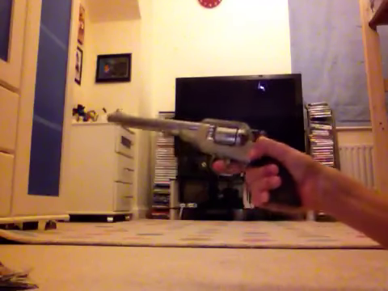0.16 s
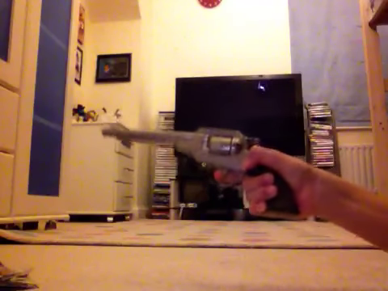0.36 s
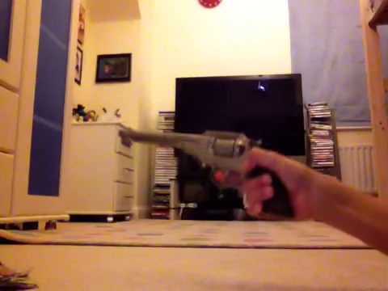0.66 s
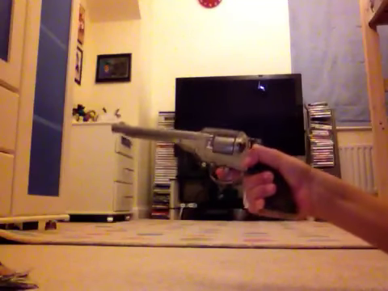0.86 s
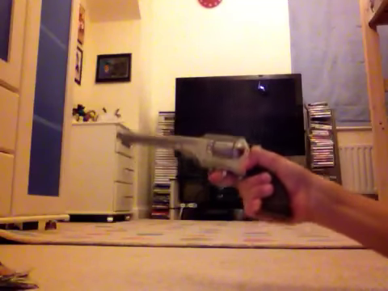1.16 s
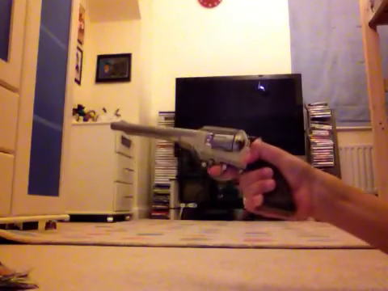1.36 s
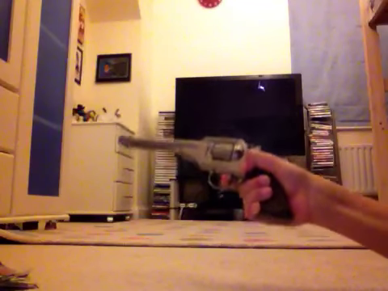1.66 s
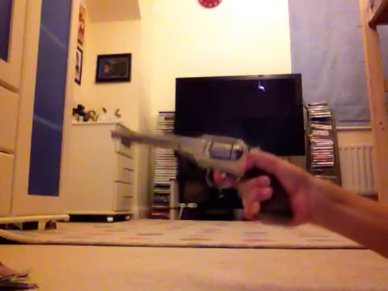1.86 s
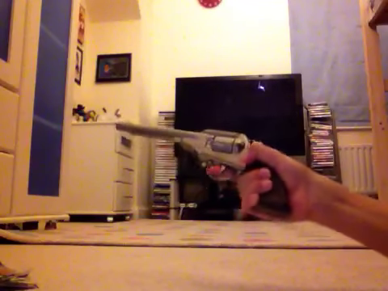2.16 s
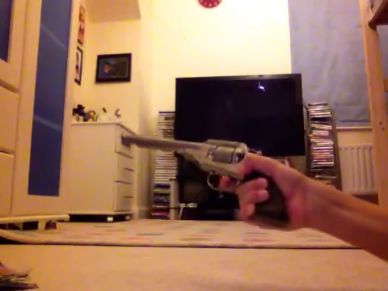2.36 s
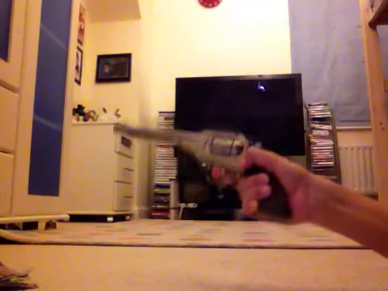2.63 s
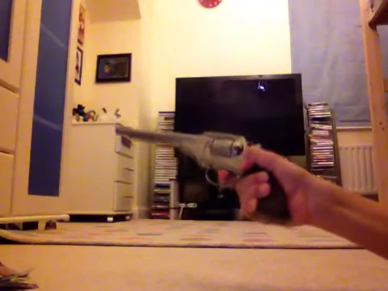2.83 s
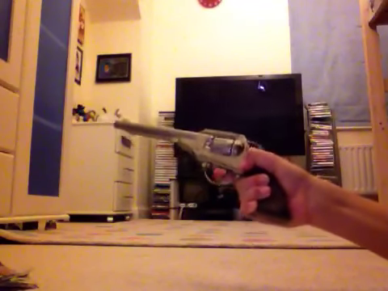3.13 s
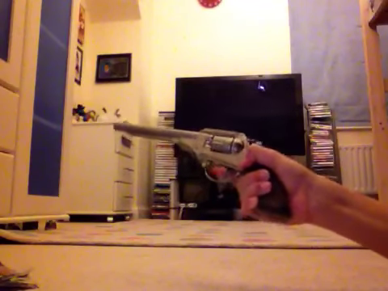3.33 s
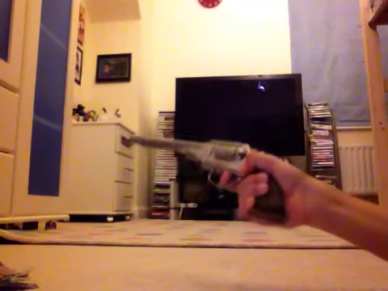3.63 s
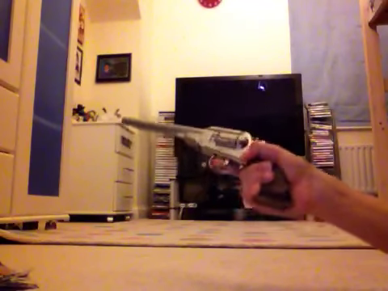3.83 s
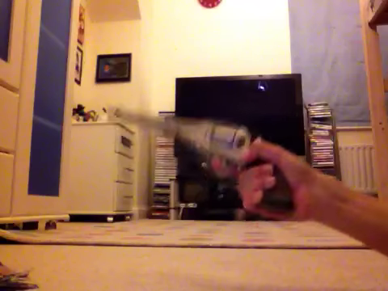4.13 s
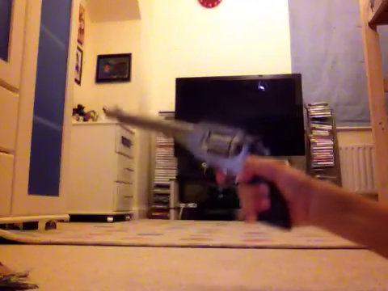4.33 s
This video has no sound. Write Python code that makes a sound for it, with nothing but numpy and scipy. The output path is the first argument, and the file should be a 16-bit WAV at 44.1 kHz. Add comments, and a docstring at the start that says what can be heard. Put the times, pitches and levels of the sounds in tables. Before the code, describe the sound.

A toy metal revolver is fired repeatedly in a small room, sharp clicks and snaps broken by two loud, distorted cap bangs.

```python
"""In a small living room, a die-cast toy revolver is fired over and over, close by.
Each pull ticks the cylinder round and drops the hammer; the trigger then snaps back.
Two caps go off and overload the microphone, one only fizzles, the other blows fall dry.
Metal contacts and cap bursts are dense random impacts, filtered so that resonances ring.
Fading noise makes the room's answer; steady noise and a motor's hum lie behind it all."""
import sys
import numpy as np
from scipy import signal
from scipy.io import wavfile
from scipy.ndimage import uniform_filter1d

SR = 44100
rng = np.random.default_rng(int(sys.argv[2]) if len(sys.argv) > 2 else 0)


def unload_audio(sound):
    """Save the sound as a 16-bit wav file, at the path given as the first command line argument."""
    columns = np.transpose(np.atleast_2d(sound))
    # keep every value between -1 and 1, then stretch to whole-number steps
    steps = np.round(np.clip(columns, -1, 1) * 32767)
    wavfile.write(sys.argv[1], SR, steps.astype(np.int16))


N = 198097  # length of the scene [samples]

TAPS = 4096  # length of one contact sound [samples]
HZ = np.fft.rfftfreq(TAPS, 1 / SR) + 1  # 1 Hz up, which keeps the logarithm finite
T = np.arange(TAPS) / SR  # time within a contact sound [s]

# trigger snapping back: (time [s], level [dB], brightness [dB per octave],
#   low ring [Hz], high ring [Hz])
RETURNS = [(-.027, -27, -2.3, 1400, 5000), (0.6911, -28, 1, 1650, 8100), (1.159, -31.5, 1.6, 1560, 12400),
           (1.7435, -28, 0.7, 2780, 5840), (2.1374, -26.5, 1, 1820, 6440), (2.5285, -31, 1.9, 2040, 7000),
           (2.906, -33, 0.6, 3130, 6000), (3.3777, -27, 1, 1150, 5500), (3.77, -25, 0.1, 2580, 5500),
           (4.1682, -26.5, 0, 1903, 7230)]
# resonances of the metal frame: (frequency [Hz], width [Hz], lift [dB])
FRAME = [(655, 36, 9), (1193, 180, 8.5), (1736, 220, 7), (2700, 190, 6), (3700, 380, 4), (5200, 420, 1.5),
         (9470, 840, 4.5), (10910, 170, 8.5), (12330, 550, 8.5)]
# how the gun's own noise carries into the room; small parts radiate little bass:
#   (frequency [Hz], relative level [dB])
CARRY = [(100, -6.5), (600, -6), (1100, -5), (1500, -2.5), (2000, 5), (2600, 4), (3400, -0.5), (5000, -2),
         (9000, 1), (15000, -1.5)]
# first reflections from ceiling and walls: (delay [s], gain before the room's colouring)
ECHOES = [(.0133, .2), (0.017, .2), (0.022, .16)]


def gain_of(db):
    """Decibels to amplitude."""
    return 10 ** (np.asarray(db) / 20)


def read(points, hz):
    """A curve joined by straight lines on a log-frequency axis."""
    f, value = np.transpose(points)
    return np.interp(np.log(hz + 1), np.log(f + 1), value)


def levelled(x, db):
    """Scales a short sound so that its energy, spread over 10 ms, has this level."""
    return x * gain_of(db) * np.sqrt(.01 * SR / np.sum(x ** 2))


def add(mix, s, sound):
    """Mixes a sound in at time s, cutting off whatever falls outside the scene."""
    at = int(round(s * SR))
    sound = sound[max(-at, 0):]
    part = mix[max(at, 0):][:len(sound)]
    part += sound[:len(part)]


def colour(x, db):
    """Filter with the gain db over HZ that never sounds early: its peaks ring after the blow."""
    log_gain = np.log(gain_of(np.r_[db, db[-2:0:-1]]))
    # the Hilbert transform finds the phase that puts the energy as early as possible
    minimum_phase = np.exp(np.conj(signal.hilbert(log_gain)))
    response = np.fft.ifft(minimum_phase).real
    return signal.fftconvolve(x, response[:TAPS // 2])[:len(x)]


def fade(start, decay):
    """A sudden rise at start and an exponential fall."""
    return (T >= start) * np.exp(-np.maximum(T - start, 0) / decay)


def chatter(envelope):
    """Dense tiny impacts of random sign under an envelope."""
    return envelope * rng.choice([-1., 1.], TAPS)


def click(contact, spectrum_db, db):
    """The direct sound of one contact: tiny impacts coloured by what they strike."""
    return levelled(colour(chatter(contact), spectrum_db), db)


def lifts(modes):
    """Resonance peaks in dB over HZ."""
    return sum(db / (1 + (2 * (HZ - hz) / width) ** 2) for hz, width, db in modes)


def ripple(size):
    """Chance unevenness over pitch, of about unit spread: no two blows ring alike."""
    return np.sqrt(size) * uniform_filter1d(rng.standard_normal(len(HZ)), size=size)


def tilt(bright_db):
    """Harder contacts are brighter: a slope in dB per octave above 1 kHz."""
    return bright_db * np.log2(np.maximum(HZ, 1000) / 1000)


def room(spectrum_db, early, length=1.0, gap=.0135, build=0.00096, linger=1.92, uneven_db=1.0):
    """Diffuse tail, thin until the ceiling and walls answer, with a weak slower decay behind it."""
    # time to fall by 60 dB, before the factor length: (frequency [Hz], time [s])
    fall_times = [(60, 0.091), (170, 0.24), (500, 0.28), (1000, 0.3), (2000, 0.22), (4000, 0.25),
                  (7000, .25), (11000, 0.23), (15000, 0.19)]
    # slow second decay, which furnishings strip of treble: (frequency [Hz], relative level [dB])
    slow_share = [(100, -18.5), (700, -20.5), (2000, -13), (4000, -15), (7000, -24), (15000, -33)]
    # resonances of the room: (frequency [Hz], width [Hz], lift [dB])
    room_modes = [(170, 72, 3), (526, 13, 1.5), (1140, 43, 2.5), (1443, 130, 5), (1868, 37, 7),
                  (2160, 140, 3), (2540, 53, 4.5), (3453, 64, 2.5), (3770, 47, 2.5)]
    t = np.arange(SR // 2) / SR
    hz, when, z = signal.stft(rng.standard_normal(len(t)), SR, nperseg=256)
    fall_db = -60 * when / (length * read(fall_times, hz)[:, None])
    slow_db = read(slow_share, hz)[:, None] + fall_db / linger
    z *= np.hypot(gain_of(fall_db), gain_of(slow_db))
    tail = signal.istft(z, SR, nperseg=256)[1][:len(t)]
    # the tail starts at the share early and fills out around gap [s], over about build [s]
    filled = (1 + np.tanh((t - gap) / build)) / 2
    tail *= early + (1 - early) * filled
    tail /= np.linalg.norm(tail)
    for delay, gain in ECHOES:
        tail[int(delay * SR)] += gain
    return colour(tail, spectrum_db + lifts(room_modes) + uneven_db * ripple(size=8))


def blow(spectrum, contact, db, bright_db, low_hz, high_hz, low_db, high_db, wet_db,
         low_width=260, high_width=900, uneven_db=1.1, frame_share=.12, ring_share=0.7):
    """Direct sound and room tail of one blow; where it lands favours two of the gun's resonances."""
    body = read(spectrum, HZ) + tilt(bright_db)
    frame = lifts(FRAME) + uneven_db * ripple(size=30)
    rings = lifts([(low_hz, low_width, low_db), (high_hz, high_width, high_db)])
    direct = click(contact, body + frame + rings, db)
    # the room hears the gun from all sides, which partly evens out its resonances
    heard = body + read(CARRY, HZ) + frame_share * frame + ring_share * rings
    tail = room(heard, early=0.26, length=0.82)
    return direct, levelled(tail, db + wet_db)


def background(hush_db=-73.5):
    """Quiet room noise with the faint hum of a household motor, each tone a steady sine."""
    # still air in the room: (frequency [Hz], relative level [dB per Hz])
    hush = [(25, -25), (55, -17.5), (90, -5.5), (180, 1.5), (300, -3), (550, -9), (1000, -8), (2200, -4),
            (5000, -12), (15000, -12.5)]
    # tones of the motor: (frequency [Hz], level [dB])
    motor_tones = [(99.8, -90), (166.7, -86)]
    air = colour(rng.standard_normal(N), read(hush, HZ))
    out = gain_of(hush_db) * air / air.std()
    for hz, db in motor_tones:
        cycles = hz * np.arange(N) / SR + rng.random()
        out += gain_of(db) * np.sqrt(2) * np.sin(2 * np.pi * cycles)
    return out


def trigger(rise=0.00045, decay=0.0026, drag_db=-36):
    """The spring drags the pawl over the ratchet and slaps the trigger against its stop."""
    # colour of the snap: (frequency [Hz], relative level [dB per Hz])
    snap = [(25, -58.5), (250, -30), (600, -14.5), (900, -17), (1500, -11.5), (3000, -4.5), (4500, -3.5),
            (5800, 1), (8000, -4.5), (15000, -6)]
    out = np.zeros(N)
    land = .008  # moment of the slap within the sound [s]
    slap = np.exp(np.minimum((T - land) / rise, (land - T) / decay))
    contact = slap + gain_of(drag_db) * (T < land)
    for s, *tone in RETURNS:
        direct, tail = blow(snap, contact, *tone, low_db=7.5, high_db=6, wet_db=-11.5)
        add(out, s - land, direct)
        add(out, s, tail)
    return out


def ticks():
    """The small contacts of every pull and release: (time [s], level [dB], brightness [dB/octave])."""
    # trigger pulls: (finger takes up the slack [s], its level [dB],
    #   cylinder locks [s], its level [dB])
    pulls = [(0.339, -66.5, .4572, -47), (.841, -56, .9397, -43.5), (1.404, -63.5, 1.5165, -57),
             (1.8279, -58, 1.9198, -48), (2.2235, -63.5, 2.317, -51), (2.6057, -62, 2.703, -47),
             (3.062, -67, 3.167, -53), (3.4747, -62, 3.559, -49.5), (3.838, -58, 3.9298, -47),
             (4.251, -56, 4.3516, -43)]
    # the pawl pushes the ratchet, the bolt snaps in, the cylinder knocks against it:
    #   (delay after the lock [s], level against the lock [dB], brightness [dB per octave])
    locking = [(-.0115, -14.5, 1.2), (0, 0.5, 4.5), (.0025, -1, -2.5)]
    # the finger eases off the trigger: (time [s], level [dB])
    eases = [(1.708, -59), (2.0873, -60.5), (3.336, -62.5), (3.732, -58), (4.0973, -62.5)]
    take_up_bright_db, ease_bright_db = -4.5, 1.3  # dB per octave: taking up the slack is dull
    # the pawl slides back over a tooth before each snap; its level is against the snap
    slide_lead_s, slide_db, slide_bright_db = 0.0094, -27, 5
    rows = []
    for slack_s, slack_db, lock_s, lock_db in pulls:
        rows.append((slack_s, slack_db, take_up_bright_db))
        for delay, db, bright_db in locking:
            rows.append((lock_s + delay, lock_db + db, bright_db))
    for s, db in eases:
        rows.append((s, db, ease_bright_db))
    for s, db, *_ in RETURNS:
        rows.append((s - slide_lead_s, db + slide_db, slide_bright_db))
    return rows


def cylinder(scrape=0.0033, grain_db=3, wet_db=-10, drag=0.012, drag_db=-17):
    """Short grainy scrapes as small parts move and lock, each inside a faint rub of metal."""
    # colour of the small contacts: (frequency [Hz], relative level [dB])
    tick_colour = [(40, -33), (300, -18.5), (800, -12), (1200, -1.5), (2000, 2.5), (4000, 1), (8000, -4),
                   (15000, -14)]
    out = np.zeros(N)
    land = .02  # moment of contact within the sound [s]
    body = read(tick_colour, HZ) + lifts(FRAME)
    catch = (T >= land) * np.exp(-(abs(T - land) / scrape) ** 3.0)
    rub = gain_of(drag_db) * np.exp(-((T - land - scrape) / drag) ** 2)
    for s, db, bright_db in ticks():
        # the strength jumps at random every 32 samples
        grains = gain_of(grain_db * np.repeat(rng.standard_normal(TAPS // 32), 32))
        contact = grains * np.hypot(catch, rub)
        add(out, s - land, click(contact, body + tilt(bright_db), db))
    tail = room(read(CARRY, HZ), early=0.18)
    tail /= np.linalg.norm(tail)
    return out + gain_of(wet_db) * signal.oaconvolve(out, tail)[:N]


def hammer(lead=0.0023, slip_db=-17, crack=0.0011, rattle=0.0029, rattle_db=-13,
           rebound=0.0028, creep_db=-38):
    """The sear creeps and slips, the hammer lands 2.3 ms later and rebounds; the grip thuds dully."""
    # hammer blows: (time [s], level [dB], brightness [dB per octave],
    #   low ring [Hz], high ring [Hz], thud in the grip [dB])
    hammer_blows = [(0.4797, -20, 1.9, 1720, 4800, -52.5), (0.9578, -27.5, -0.5, 1263, 4600, -62),
                    (1.5545, -16.5, 2.57, 2660, 9600, -50.5), (1.9455, -19, 3.5, 2240, 12300, -49),
                    (2.3438, -17.5, 3.5, 1910, 13000, -37), (2.7269, -30, 0.5, 1274, 4630, -65),
                    (3.1988, -20, 1.8, 3150, 3720, -58.5), (3.5855, -20.5, 1.7, 2290, 3700, -63),
                    (3.9544, -18, 2.5, 2760, 7870, -49.5), (4.3724, -20, 3, 1750, 6300, -51.5)]
    # colour of the strike: (frequency [Hz], relative level [dB per Hz])
    strike = [(25, -63), (200, -28), (500, -17), (900, -13), (1500, -6), (2500, -4.5), (4700, 0),
              (8000, -5.5), (15000, -6.5)]
    # colour of the thud in the grip: (frequency [Hz], relative level [dB])
    thud = [(20, -47), (50, -28.5), (100, -12.5), (170, 3), (300, 0), (700, -6.5), (1300, -9.5),
            (4000, -25.5)]
    rebound_s, rebound_db = 0.0027, -10.5  # the hammer bounces once
    out = np.zeros(N)
    land = .008  # moment of the blow within the sound [s]
    stages = [gain_of(creep_db) * np.exp(-abs(T - land + lead) / .0025),  # creep
              gain_of(slip_db) * fade(land - lead, 0.0014),  # slip
              fade(land, crack),
              gain_of(rattle_db) * fade(land, rattle),
              gain_of(rebound_db) * fade(land + rebound_s, rebound)]
    contact = np.linalg.norm(stages, axis=0)  # the stages add up in energy
    knock = colour(-signal.unit_impulse(TAPS), read(thud, HZ))
    for s, *tone, thud_db in hammer_blows:
        direct, tail = blow(strike, contact, *tone, low_db=8, high_db=3.5, wet_db=-10.5)
        add(out, s - land, direct)
        add(out, s, tail)
        add(out, s, levelled(knock, thud_db))
    return out


def caps(burn=0.0015, floor_delay=0.0024, floor_gain=.9, bounce_gain=0.38, bounce=0.0066):
    """A burst of hot gas, its bounces off floor, ceiling and walls, and the whole room ringing."""
    # caps that go off: (time [s], level [dB], room level [dB], brightness [dB per octave])
    explosions = [(0.959, -9.5, -8, -1), (2.7289, -10.5, -8.5, -1.5)]
    # colour of the burst: (frequency [Hz], relative level [dB])
    blast = [(25, -10), (70, -22.5), (160, 2.5), (350, 0), (700, 1.5), (1200, -0.5), (2000, -0.5),
             (4000, 3), (8000, 1.5), (15000, -3)]
    # the room's answer to a cap: (frequency [Hz], relative level [dB])
    boom = [(30, -26.5), (80, -11.5), (160, -5), (350, -11), (800, -6.5), (1300, -2), (2100, 6.5),
            (4000, 4.5), (8000, 3), (15000, -3.5)]
    out = np.zeros(N)
    bursts = [fade(0, burn), floor_gain * fade(floor_delay, bounce)]
    bursts += [bounce_gain * fade(delay, bounce) for delay, _ in ECHOES]
    contact = np.linalg.norm(bursts, axis=0)
    for s, db, wet_db, bright_db in explosions:
        add(out, s, click(contact, read(blast, HZ) + tilt(bright_db), db))
        tail = room(read(boom, HZ) + tilt(bright_db), early=0.46)
        add(out, s, levelled(tail, wet_db))
    return out


def fizzle(db=-47, swell=0.069):
    """A weak cap smoulders: a short soft hiss of noise that swells and dies away."""
    # colour of the hiss: (frequency [Hz], relative level [dB per Hz])
    hiss = [(60, -17.5), (200, -6), (450, 2), (800, -8), (2000, 3.5), (6000, -3.5), (15000, -13)]
    t = np.arange(SR // 2) / SR
    gas = rng.standard_normal(len(t)) * t * np.exp(-t / swell)
    out = np.zeros(N)
    add(out, 2.35, levelled(colour(gas, read(hiss, HZ)), db))
    return out


def scene():
    """The gun and the room at one microphone."""
    gun = trigger() + cylinder() + hammer() + caps() + fizzle()
    return (background() + gun)[None]


def record(dry):
    """The microphone overloads with a firm knee; then the highest treble is cut off."""
    ceiling, edge_hz = .66, 15350  # loudest amplitude let through, top of the band [Hz]
    clipped = dry / (1 + (dry / ceiling) ** 6) ** (1 / 6)
    low_pass = signal.firwin(255, edge_hz, window=("kaiser", 8), fs=SR)
    return signal.oaconvolve(clipped, low_pass[None], "same")


dry = scene()
out = record(dry)
unload_audio(out)
```